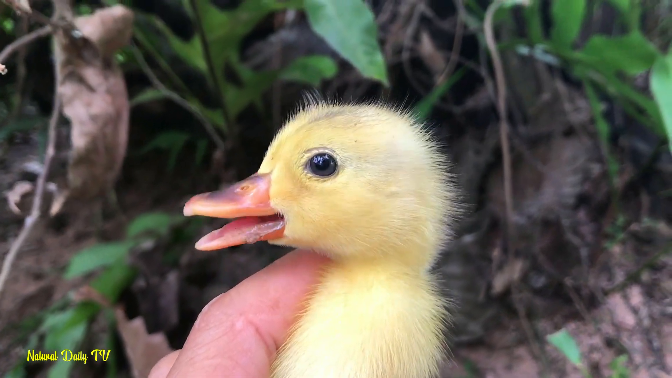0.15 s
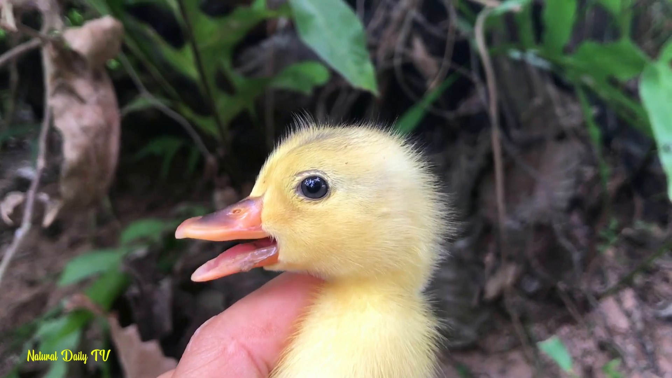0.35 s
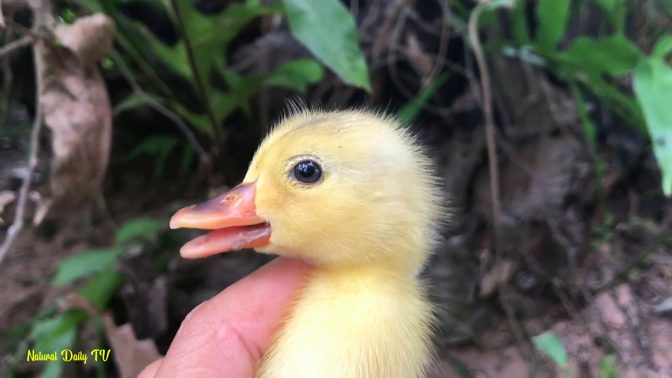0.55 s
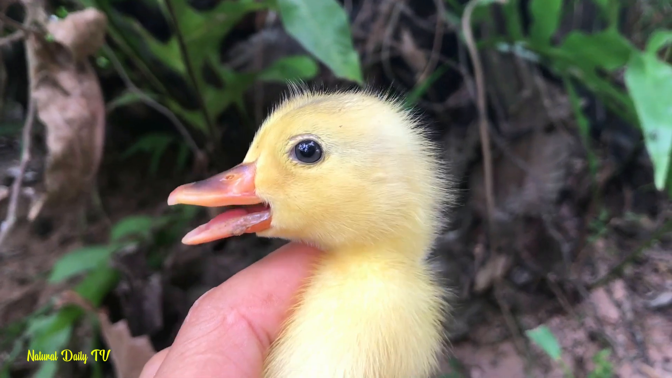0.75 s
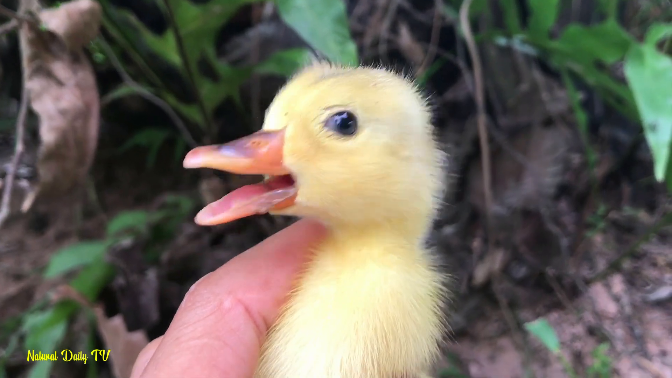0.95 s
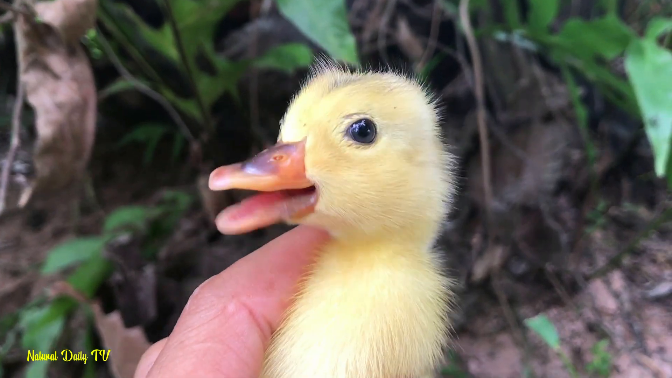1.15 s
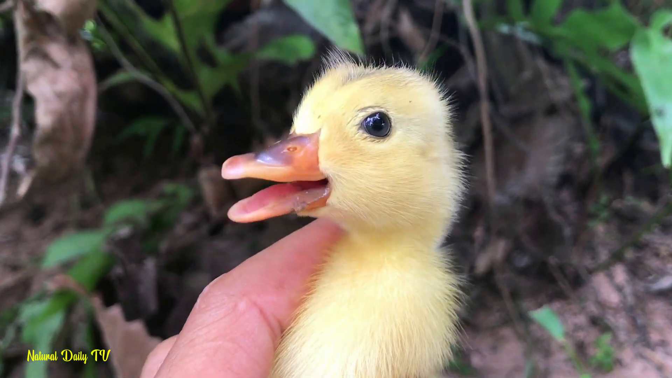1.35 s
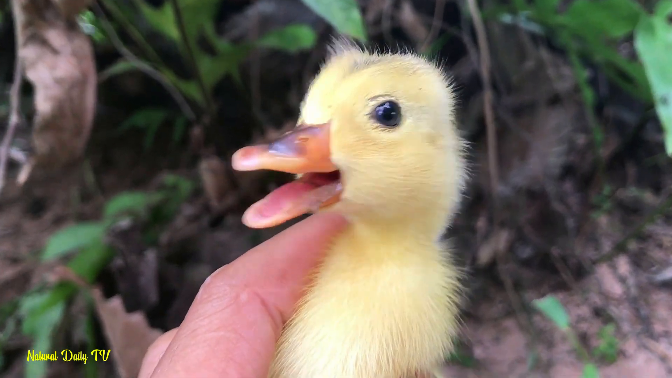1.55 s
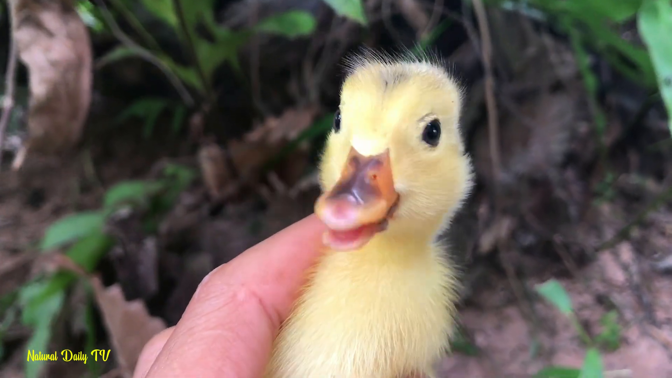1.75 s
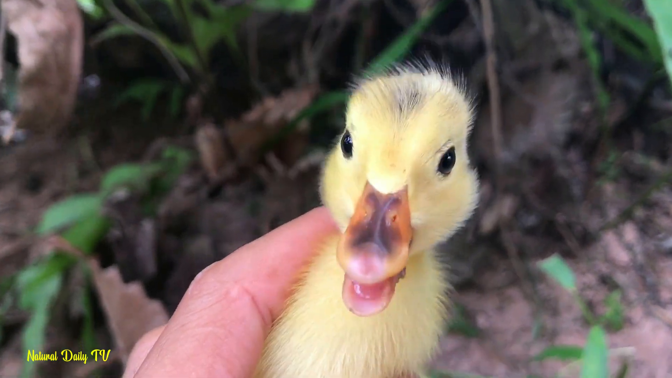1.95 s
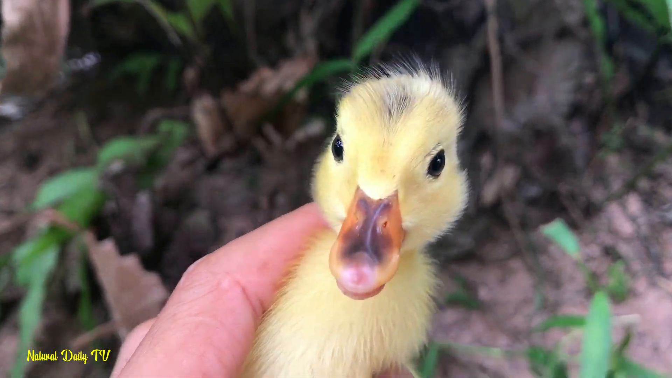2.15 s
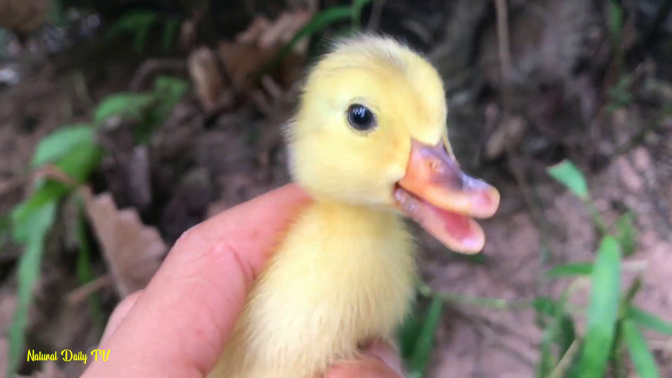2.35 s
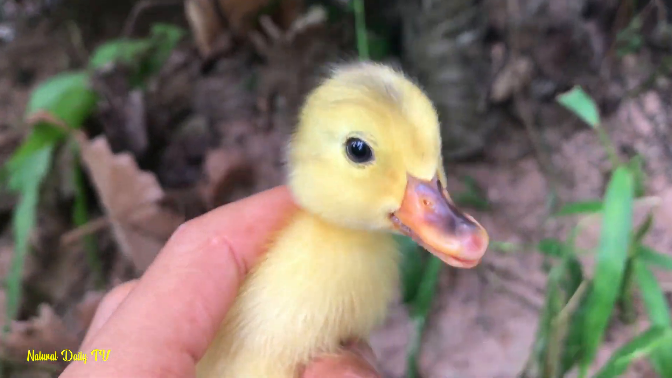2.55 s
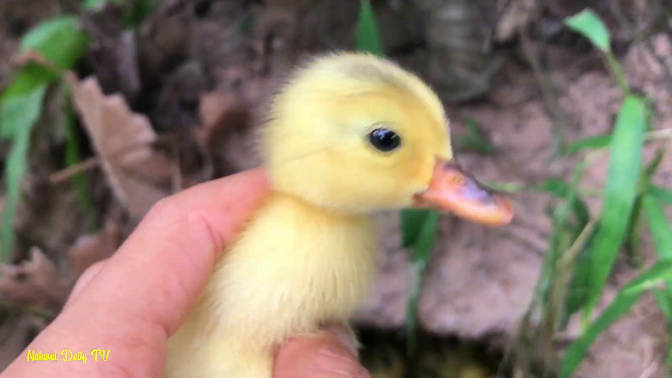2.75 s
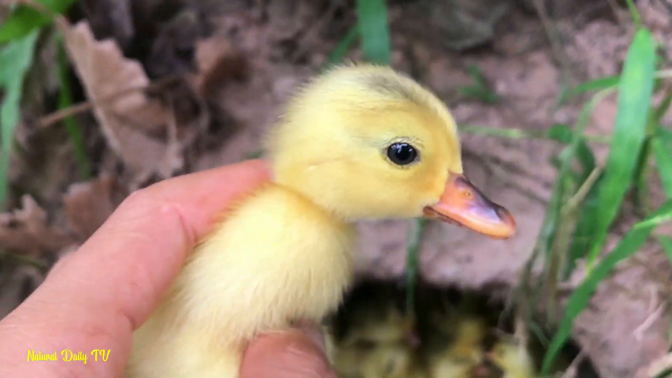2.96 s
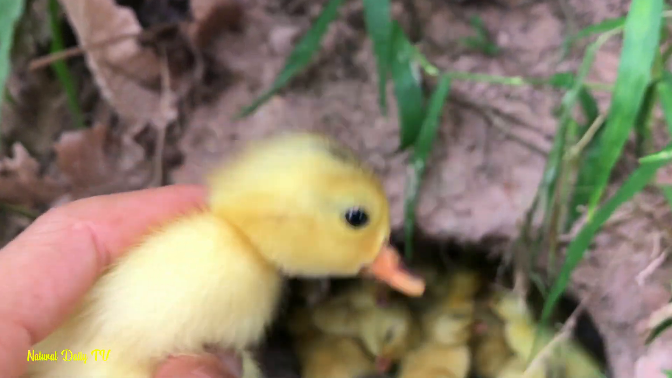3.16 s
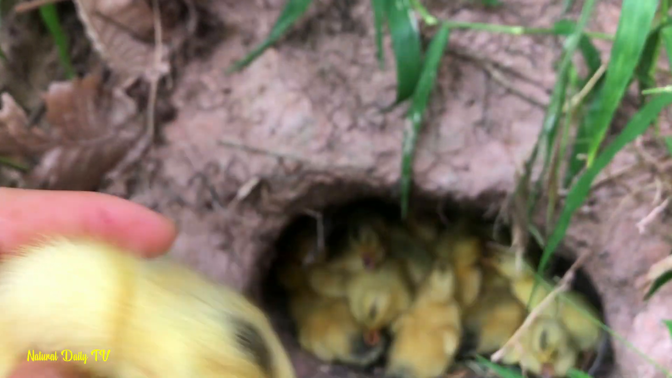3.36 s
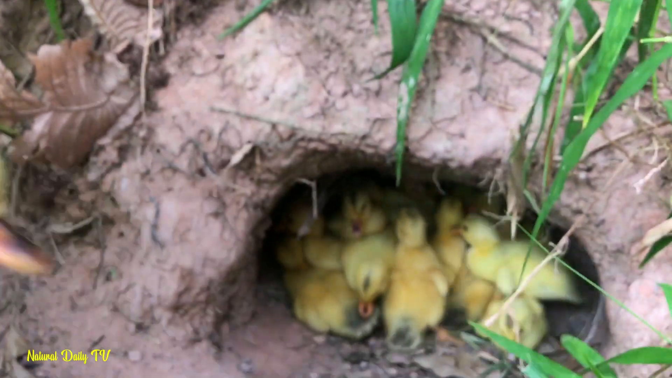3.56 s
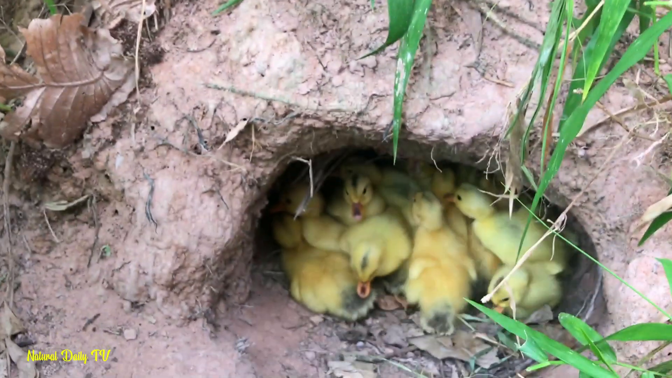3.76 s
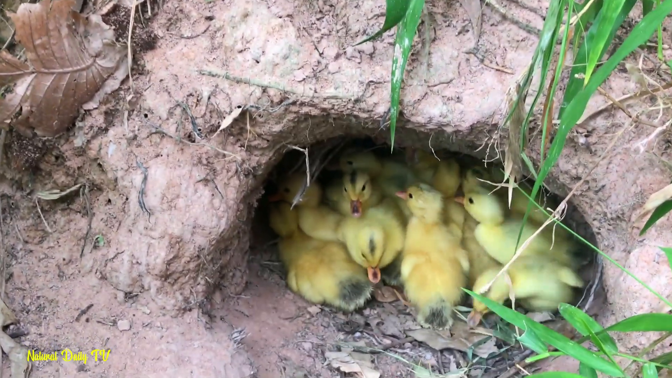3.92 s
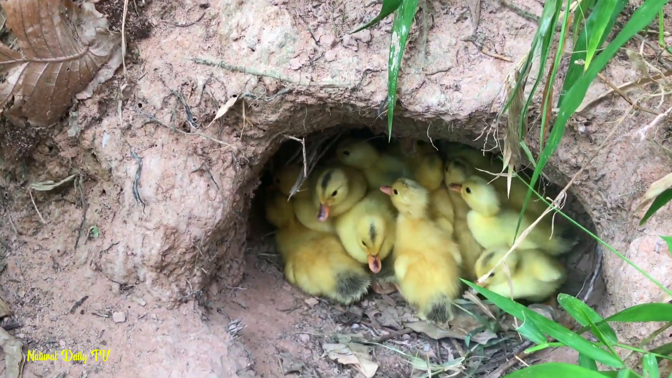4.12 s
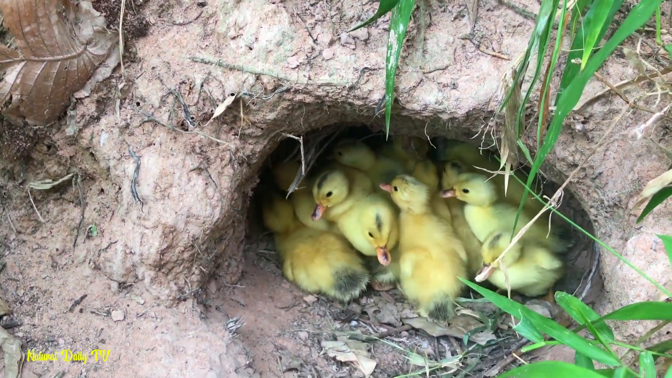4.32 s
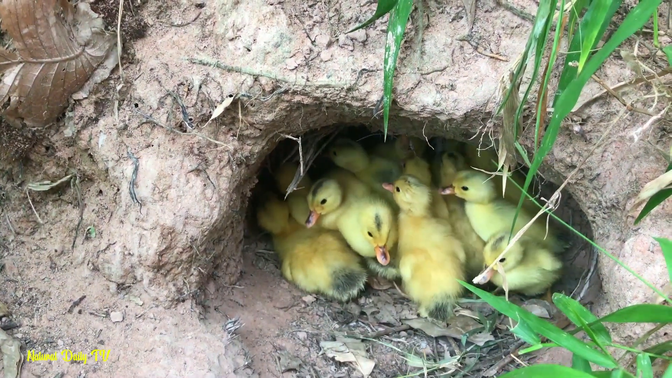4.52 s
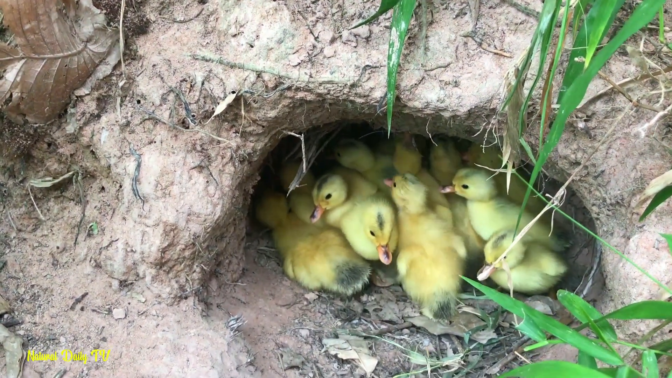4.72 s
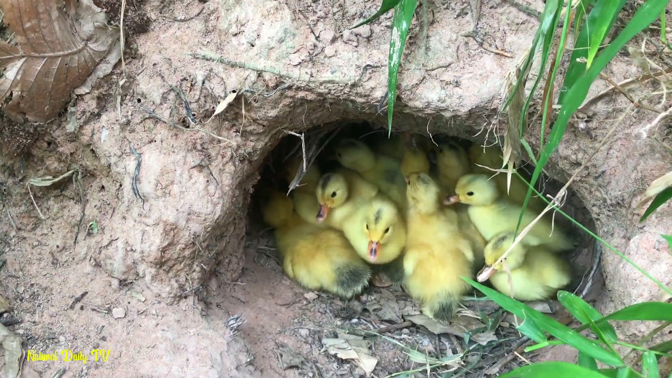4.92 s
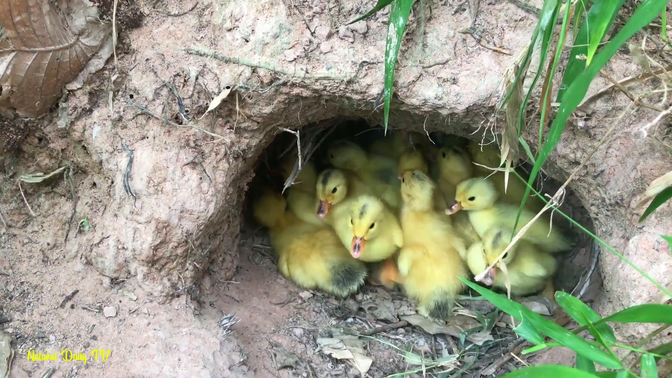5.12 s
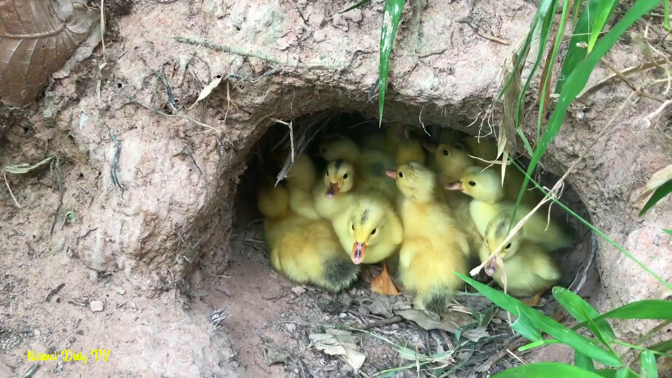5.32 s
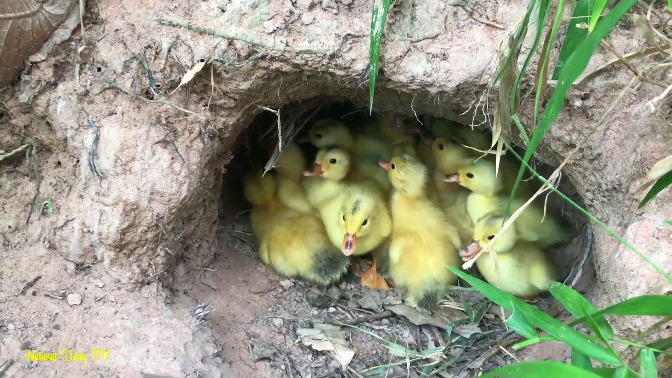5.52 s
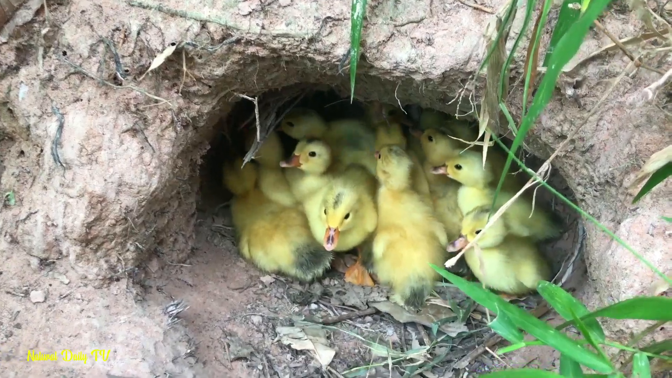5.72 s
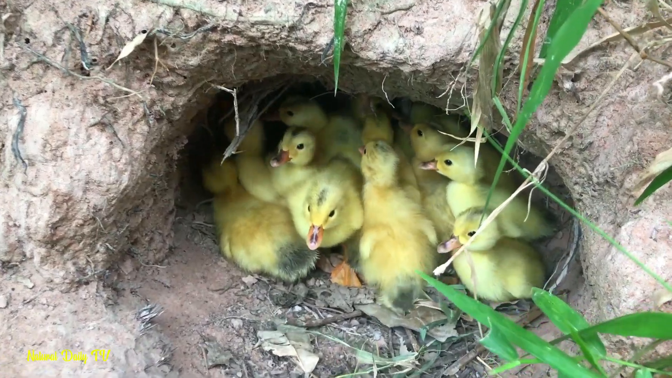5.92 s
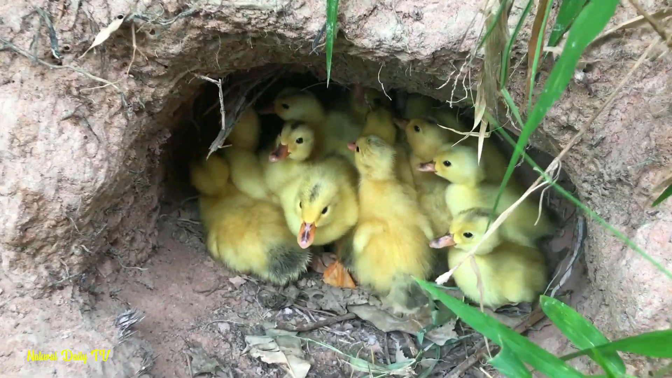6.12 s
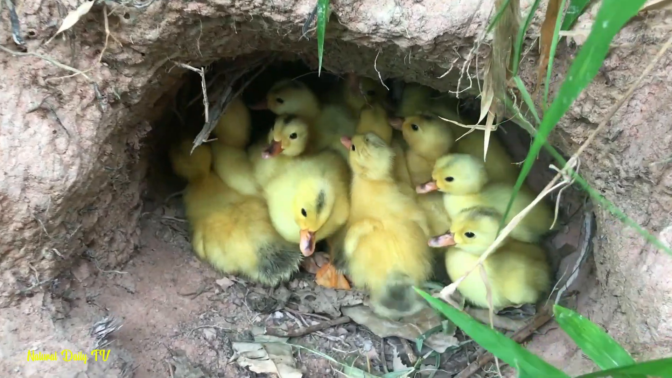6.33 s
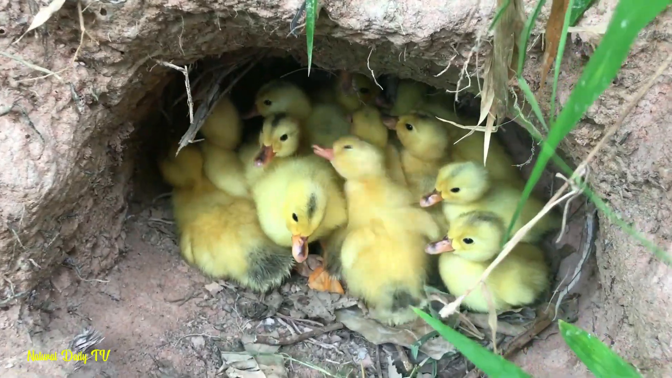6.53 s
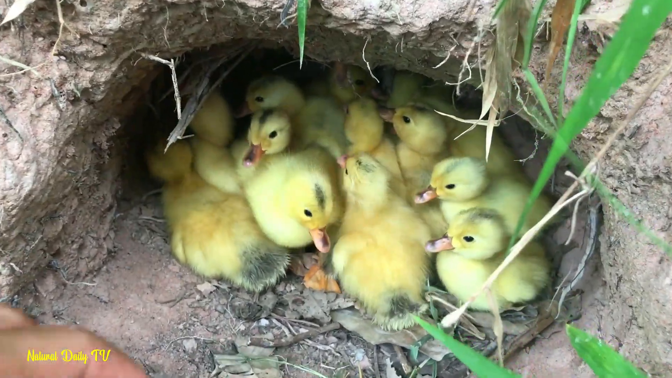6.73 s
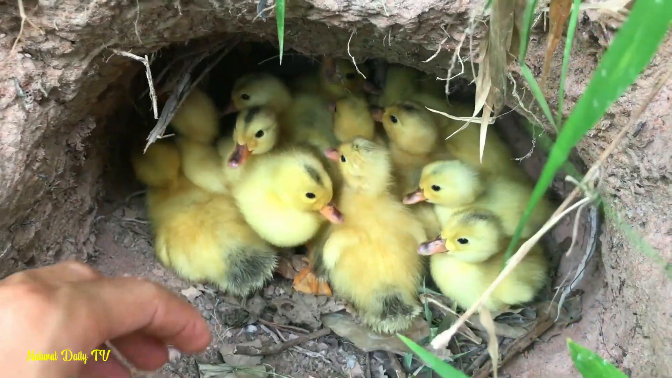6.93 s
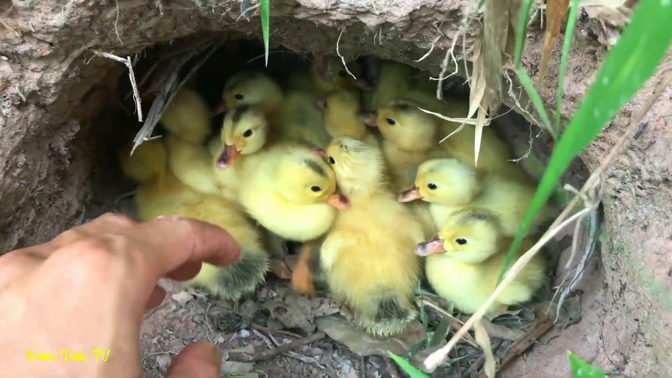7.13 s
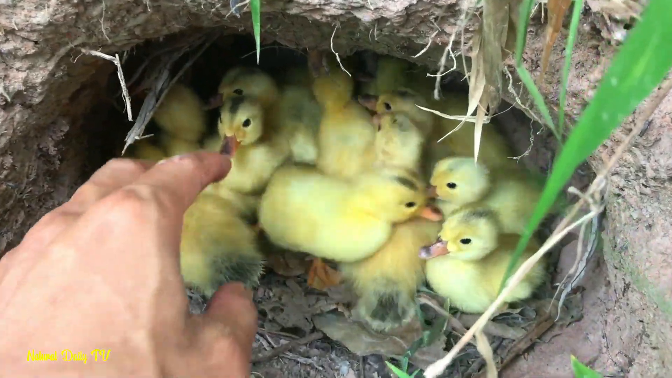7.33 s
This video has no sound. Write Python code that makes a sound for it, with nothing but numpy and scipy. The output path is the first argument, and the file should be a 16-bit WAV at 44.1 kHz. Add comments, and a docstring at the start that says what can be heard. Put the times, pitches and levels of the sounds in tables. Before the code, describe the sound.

From the start until about 2.5 seconds, a duckling very close to the microphone gives eight loud, shrill peeps, roughly three a second. Each is a short, slightly raspy whistle that leaps up, slides down and flicks at the end. Much softer arched peeps come from its nest mates in a soil hollow, scattered until about 6 seconds. Dry leaves snap and rustle from 2.6 to 4 seconds, again around 5.3 and 6, and at the very end. Dull, hollow bumps of fingers and steps come now and then, strongest near 4.9 seconds, with a low, heavy footfall and another thump around 7. Distant birds whistle faintly between 2 and 3 seconds, honk near 2.2 and 4.5, and twitter from 6 onward. A quiet low rumble and a hiss of open air run throughout.

```python
"""A duckling, held close, peeps eight loud syrinx whistles that leap, slide, flick and drop.
Its nest mates answer with soft arched peeps from a hollow in the soil; far birds whistle and honk.
Dry leaves rustle and snap in bursts of noise, fingers and steps thump a hollow body, and one heavy
footfall shakes the soil. A distant rumble hums under the hiss of the air."""
import sys
import numpy as np
from scipy import signal
from scipy.fft import rfft, irfft, next_fast_len
from scipy.io import wavfile
from scipy.ndimage import uniform_filter1d, map_coordinates

SR = 44100
rng = np.random.default_rng(int(sys.argv[2]) if len(sys.argv) > 2 else 0)


def transcribe(signal):
    """Save signal, clipped to [-1, 1], as a 16-bit WAV file at the path in sys.argv[1]."""
    frames = np.atleast_2d(signal).T
    limited = np.clip(frames, -1, 1)
    pcm = np.round(limited * 32767).astype(np.int16)
    wavfile.write(sys.argv[1], SR, pcm)


N = 325458
TOP_HZ = 15900


def amp(db):
    return 10 ** (np.asarray(db) / 20)


def unit(x):
    return x / np.sqrt(np.mean(x ** 2) + 1e-20)


def curves(rows):
    """One value per sample for each column after the time."""
    times, *columns = np.transpose(rows)
    return [np.interp(np.arange(N) / SR, times, column) for column in columns]


def wobble(rate, size=N):
    """A smooth random curve, rate knots a second."""
    return map_coordinates(rng.standard_normal(size=4096), [np.arange(size) * rate / SR])


def filtered(x, response):
    """x shaped by a gain that depends on frequency."""
    padded = next_fast_len(len(x) + 8192)
    return irfft(rfft(x, padded) * response(np.fft.rfftfreq(padded, 1 / SR)), padded)[:len(x)]


def noise(spectrum, size=N):
    """Noise of rms about 1, coloured by (frequency [Hz], level [dB]) points."""
    points_hz, db = np.transpose(spectrum)
    white = rng.standard_normal((size // 8192 + 1) * 8192)
    return unit(filtered(white, lambda hz: amp(np.interp(np.log(hz + 1), np.log(points_hz), db))))[:size]


def tone(hz):
    """A sine of rms 1 that follows a pitch curve."""
    return np.sqrt(2) * np.sin(2 * np.pi * (np.cumsum(hz) / SR + rng.random()))


def add(out, start, x):
    """Mixes x into out from start [s]."""
    part = out[round(start * SR):][:len(x)]
    part += x[:len(part)]


def fades(length, attack, release):
    """An envelope of length [s]; attack and release are shares of it."""
    u = np.linspace(0, 1, round(length * SR))
    return np.clip(np.minimum(u / attack, (1 - u) / release), 0, 1)


def chance_times(rate):
    """Scattered moments, rate a second, each with two normal draws."""
    slots = np.arange(0, N / SR - 1 / rate, 1 / rate)
    return zip(slots + rng.random(len(slots)) / rate, *rng.standard_normal((len(slots), 2)).T)


# Fader rides of the ambience: (time [s], leaf hiss level [dB], air level [dB])
BED_LEVELS = [(0.0, -69.5, -68), (0.31, -64, -70), (0.49, -70.5, -69.5), (0.9, -68.5, -66.5),
              (1.03, -76, -70.5), (2.82, -69, -69), (3.14, -63.5, -66.5), (4.01, -67.5, -70),
              (4.79, -69, -66), (5.36, -62.5, -66), (5.61, -70, -68.5), (6.27, -68.5, -68),
              (7.03, -73, -68.5), (7.38, -69, -67.5)]
# Colours of open air, far rumble and crisp leaves: (frequency [Hz], level [dB])
AIR_EQ = [(60, -27), (110, -8), (220, -9.5), (320, -7.5), (420, -13.5), (640, -12.5), (1100, -14.5),
          (1900, -20.5), (4300, -23.5), (6500, -45)]
RUMBLE_EQ = [(20, -33.5), (32, -15.5), (48, -9), (62, 4), (77, -8.5), (100, -4.5), (125, -11), (200, -20),
             (300, -49.5)]
LEAF_EQ = [(880, -30), (1500, -5), (2610, -6.5), (5440, -3.5), (7240, -7), (8830, -5), (10200, -8.5),
           (11300, -3.5), (15100, -10.5), (16000, -20.5)]


def outdoor_bed():
    """Patchy air, a distant rumble and the flickering hiss of dry leaves, grainy with tiny ticks."""
    leaf_db, air_db = curves(BED_LEVELS)
    air = amp(air_db + 4.5 + 1.6 * wobble(16) + .8 * wobble(6)) * noise(AIR_EQ)
    rumble = amp(-59) * noise(RUMBLE_EQ)
    ticks = (rng.random(N) < 80 / SR) * amp(4 + 3.3 * rng.exponential(size=N))
    grain = 1 + .3 * signal.lfilter([1], [1, -.95], ticks)
    hiss = amp(leaf_db + 2.5 * wobble(50) + 1.2 * wobble(14)) * unit(grain * noise(LEAF_EQ))
    return air + rumble + hiss


# Close peeps: (time [s], leap length [s], flick delay [s], crest pitch [Hz], dip pitch [Hz],
# flick pitch [Hz], crest level [dB], shoulder level [dB])
LOUD_PEEPS = [(0.0593, 0.0065, 0.11, 4170, 3556, 4190, -21, -28),
              (0.3583, 0.0064, 0.1, 4200, 3535, 4270, -19, -27.5),
              (0.656, 0.005, .1045, 4173, 3620, 4100, -19, -26.5),
              (0.9459, 0.0064, 0.11, 4234, 3560, 4654, -19.5, -24),
              (1.249, .0076, 0.11, 4210, 3532, 4366, -17.5, -25.5),
              (1.5596, .0064, 0.1, 4115, 3440, 3774, -17.5, -27),
              (1.8887, 0.0079, 0.1, 4140, 3330, 3812, -17.5, -27.5),
              (2.3576, 0.019, 0.088, 4197, 3603, 4500, -16, -26.5)]
# Timbre at start, crest, slide, dip, shoulder, flick and end, relative to the whistle:
# (2nd harmonic [dB], 3rd harmonic [dB], 4th harmonic [dB], side voice [dB], rasp [dB])
PEEP_TIMBRE = [(-30.5, -41, -49.5, -18, -14.5), (-22.5, -30, -43, -22.5, -29.5),
               (-20.5, -28.5, -35, -29.5, -32), (-21, -29.5, -36, -30.5, -32.5),
               (-16, -28.5, -36, -32, -33), (-18.5, -29, -49, -16.5, -21), (-20, -47, -51, -36, -26)]
# The throat's shaping of the overtones, and the colour of the rasp: (frequency [Hz], level [dB])
THROAT_EQ = [(6000, 1), (8200, 0), (8800, -15.5), (10000, -5), (11500, 0.5), (13000, -5.5), (14500, -0.5)]
RASP_EQ = [(1500, -58.5), (2500, -21), (4400, -2.5), (5450, 4.5), (6200, -6), (8400, -7.5), (9300, -23.5),
           (11500, -8), (16000, -7)]
PEEP_S, SLIDE_S, SHOULDER_S, TAIL_S = .1135, .043, .009, .0023
DROP_S_PER_HZ, SPENT_DB_PER_S = 4e-6, 904  # a higher flick falls longer; a slower drop is fainter


def held_duckling():
    """A syrinx whistle: leap up, slide down, climb, flick, drop; with overtones, a side voice and rasp."""
    out = np.zeros(N)
    for start, leap, flick_delay, crest_hz, dip_hz, flick_hz, crest_db, shoulder_db in LOUD_PEEPS:
        crest, flick = start + leap, start + flick_delay
        slide, dip, shoulder = crest + SLIDE_S / 2, crest + SLIDE_S, flick - SHOULDER_S
        end = start + PEEP_S + (flick_hz - crest_hz) * DROP_S_PER_HZ
        end -= .44 * (PEEP_S - SHOULDER_S - flick_delay)  # an early flick cuts the peep short
        t = np.arange(start, end + TAIL_S, 1 / SR)

        shoulder_hz = dip_hz + .47 * (flick_hz - dip_hz)
        bends = [(start, 3050), (start + .34 * leap, (.99 - 4.5 * leap) * crest_hz), (crest, crest_hz),
                 (slide, .38 * crest_hz + .622 * dip_hz), (dip, dip_hz),
                 ((dip + flick) / 2, .52 * dip_hz + .48 * shoulder_hz), (shoulder, shoulder_hz),
                 (flick, 1.01 * flick_hz), (.6506 * flick + .3507 * end, .95 * flick_hz),
                 (end + TAIL_S, .77 * dip_hz - 420)]
        hz = uniform_filter1d(np.interp(t, *np.transpose(bends)), size=80)
        hz *= 1 + .0036 * wobble(350, len(t))

        # the level swells past the crest, eases off, and breaks just before the flick
        dip_db = -24.9 + .35 * (crest_db + 18)
        flick_db = shoulder_db - 4.5 - SPENT_DB_PER_S * max(end - flick - .012, 0)
        envelope = [(start, -46), (start + .35 * leap, crest_db - 10), (crest, crest_db - 6),
                    (crest + .005, crest_db - 1), (crest + .013, crest_db), (slide, crest_db - 4),
                    (dip, dip_db), (flick - .006, shoulder_db), (flick - .002, flick_db),
                    (.4 * flick + .6 * end, flick_db), (end, -43), (end + TAIL_S, -66)]
        db = np.interp(t, *np.transpose(envelope)) + .6 * wobble(200, len(t))

        stages = [start, crest, slide, dip, shoulder, flick, end]
        *overtones_db, side_db, rasp_db = (np.interp(t, stages, c) for c in np.transpose(PEEP_TIMBRE))
        phase = 2 * np.pi * np.cumsum(hz) / SR
        whistle = np.sin(phase)
        effort_db = .7 * (crest_db + 19.5)  # harder peeps are brighter
        for k, overtone_db in enumerate(overtones_db, start=2):
            in_band = k * hz < TOP_HZ + 1000
            throat_db = np.interp(k * hz, *np.transpose(THROAT_EQ))
            flutter_db = 2.2 * wobble(50, len(t)) + 1.6 * wobble(500, len(t))
            whistle += in_band * amp(overtone_db + effort_db + throat_db + flutter_db) * np.sin(k * phase)

        # a second membrane beats with the first: a broken tone above it, further off at high pitch
        side_hz = hz + 800 + 1.2 * np.clip(hz - 3650, 0, None) + 55 * wobble(410, len(t))
        side = amp(side_db + .7 + 4.2 * wobble(170, len(t))) * tone(side_hz)
        rasp_db += 2 + .6 * (crest_db + 19) + 2 * wobble(120, len(t))
        rasp = amp(rasp_db) * noise(RASP_EQ, len(t))
        add(out, start, amp(db) * (np.sqrt(2) * whistle + side + rasp))
        tick = amp(-60 * (t - start) / .008) * noise(LEAF_EQ, len(t))
        add(out, start - .002, amp(crest_db - 12.5 - 1500 * leap) * tick)  # faster leap, harder attack
    return out


# Answers from the nest: (time [s], rise [s], fall [s], crest pitch [Hz], end pitch [Hz], level [dB])
SOFT_PEEPS = [(0.098, 0.0028, 0.026, 3250, 1980, -51.5), (1.055, 0.012, 0.033, 2360, 1810, -63),
              (1.378, 0.015, 0.054, 3090, 1850, -55.5), (1.638, 0.0062, 0.042, 3030, 2004, -51),
              (1.91, 0.01, 0.049, 2810, 1870, -52), (2.254, 0.018, 0.04, 2820, 2000, -46.5),
              (2.609, 0.014, 0.035, 2850, 2070, -45), (2.86, 0.017, 0.041, 3084, 2220, -47.5),
              (3.718, .036, .062, 3510, 2200, -58), (3.959, .028, .048, 3830, 2520, -60),
              (4.03, .004, .045, 2650, 2500, -61), (4.23, .031, .024, 3860, 2820, -54.5),
              (4.249, .016, .04, 3430, 2180, -51), (4.392, .024, 0.061, 3530, 1960, -56.5),
              (5.465, 0.023, 0.023, 2890, 2220, -51), (5.545, 0.0058, .025, 3250, 2560, -61.5),
              (5.575, 0.02, 0.033, 3314, 2240, -54), (5.74, 0.021, 0.03, 3350, 2430, -54.5),
              (5.93, 0.018, 0.026, 3050, 2280, -56.5)]
MEAN_RISE_HZ_PER_S = 40000


def nest_mates():
    """Soft arched whistles: a quick rise and a mostly longer fall."""
    out = np.zeros(N)
    for start, rise, fall, crest_hz, end_hz, db in SOFT_PEEPS:
        t = np.arange(0, rise + fall, 1 / SR)
        rising = MEAN_RISE_HZ_PER_S * rise * (1 - t / rise) ** 2
        falling = (crest_hz - end_hz) * (np.sin((t - rise) / fall) / np.sin(1)) ** 2
        hz = crest_hz - np.where(t < rise, rising, falling) + 40 * wobble(300, len(t))
        swell = np.abs(np.sin(np.pi * (t / (rise + fall)) ** 1.12)) ** .55
        add(out, start, amp(db - 2.2 + 2.7 * wobble(130, len(t))) * swell * tone(hz))
    return out


# Strokes through dry leaves: (time [s], length [s], scrape level [dB], fizz level [dB])
LEAF_STROKES = [(0.244, .02, -63, -51), (0.296, 0.021, -62, -56), (0.321, .016, -67.5, -51),
                (0.573, .019, -66, -52), (1.832, .03, -70.5, -66), (2.96, .02, -67, -56),
                (2.984, 0.049, -55, -56.5), (3.03, .14, -60, -77), (3.5, .065, -66.5, -58),
                (3.618, .05, -68, -59.5), (3.743, .06, -62, -57), (4.028, 0.035, -62, -60.5),
                (4.119, .03, -71, -64.5), (4.351, .063, -61, -57), (4.552, .02, -58, -62),
                (4.873, .038, -54, -57), (4.951, 0.012, -55.5, -60.5), (5.098, 0.035, -60.5, -59.5),
                (5.15, 0.024, -58, -61.5), (5.243, .055, -69, -61), (5.355, 0.105, -78, -65.5),
                (5.751, .03, -61.5, -66), (6.06, 0.022, -58.5, -66), (6.5, 0.11, -69, -66),
                (7.19, .035, -75, -62)]
# Midrange colour of the scrape: (frequency [Hz], level [dB])
SCRAPE_EQ = [(350, -34), (750, -2.5), (1500, -1.5), (2600, -5), (5000, -28.5)]


def leaf_brushes():
    """Brushed leaves give a gritty scrape and a bright fizz: set strokes, faint strays, one per snap."""
    leaf_db = curves(BED_LEVELS)[0]
    strays = [(start, .015, *(leaf_db[round(start * SR)] + 2 + 3 * np.array([a - 1.5, b])))
              for start, a, b in chance_times(rate=3.5)]
    with_snaps = [(start - .004, .0164, db - 34.5, db - 26) for start, db, _ in LEAF_SNAPS]
    scrape, fizz = np.zeros(N), np.zeros(N)
    for start, length, scrape_db, fizz_db in LEAF_STROKES + strays + with_snaps:
        stroke = fades(length + .0052, attack=.15, release=.4)
        add(scrape, start, amp(scrape_db) * stroke)
        add(fizz, start, amp(fizz_db) * stroke)
    grit = unit(amp(3.6 * wobble(300)))
    return amp(1.1) * grit * (scrape * noise(SCRAPE_EQ) + fizz * noise(LEAF_EQ))


# Finger bumps and steps: (time [s], level [dB], knock gain above 400 Hz [dB])
BLOWS = [(2.205, -50, -5), (2.455, -48, -10.5), (2.75, -50, -0.5), (4.002, -44.5, -5), (4.57, -49, -6.5),
         (4.734, -51.5, 0.5), (4.87, -43.5, 3.5), (4.88, -27.5, -6.5), (4.896, -38, -9), (4.93, -50, 2),
         (4.96, -41.5, -6), (5.1, -38, -6.5), (5.227, -50, -8.5), (5.824, -57, 7), (6.015, -49.5, -2.5),
         (6.063, -58, 6), (6.26, -48.5, -6), (6.969, -39.5, -8), (7.128, -33.5, -6), (7.25, -46.5, -4)]
# Resonances of the hollow body: (frequency [Hz], level [dB], time to fall 60 dB [s])
BODY_MODES = [(160, 4, .11), (240, 1, .06), (305, -2, .065), (553, -1, 0.043), (698, 1.5, 0.035),
              (950, -2, 0.033), (1330, -6.5, 0.037), (1730, -10.5, .025)]
BOOM_DB = -12.5  # trim on the lowest mode


def thumps():
    """Dull blows, with faint strays throughout, ring one hollow body a little differently each time."""
    out, t = np.zeros(N), np.arange(SR // 5) / SR
    strays = [(start, -58 + 2 * a, 3 * b) for start, a, b in chance_times(rate=1.5)]
    attack = 1 - np.exp(-t / .0016)
    for start, db, knock_db in BLOWS + strays:
        ring = np.zeros(len(t))
        for hz, mode_db, t60 in BODY_MODES:
            struck_db = mode_db + (hz < 200) * BOOM_DB + (hz > 400) * knock_db + rng.normal(0, 2.5)
            detuned_hz = hz * (1 + rng.normal(0, .05))
            ring += amp(struck_db - 60 * t / t60) * np.sin(2 * np.pi * detuned_hz * t)
        add(out, start, amp(db + 1.46) * attack * ring)
    return out


# Distant whistles and honks: (time [s], length [s], pitch [Hz], level [dB])
FAR_WHISTLES = [(2.11, .15, 2790, -65.5), (2.47, .15, 2884, -61), (2.66, .12, 2180, -67.5),
                (2.79, 0.17, 2960, -57), (2.8, 0.11, 2135, -64), (4.77, 0.065, 2195, -62),
                (6.35, .05, 3660, -72), (6.5, .05, 3680, -70), (6.573, 0.07, 4310, -66),
                (6.71, 0.076, 4430, -71), (7.01, .04, 2315, -66), (7.27, 0.068, 3540, -68)]
FAR_HONKS = [(2.199, 0.092, 331.5, -64), (4.547, 0.25, 332, -64.5)]
# Nasal timbre of a honk: (harmonic [number], level [dB])
HONK_TIMBRE = [(2, -11.5), (3, -11), (4, 1.5), (5, -8.5), (7, -12.5)]
TWITTER_FROM_S, TWITTER_STEP_S, TWITTER_NOTE_S = 6.02, .14, .06


def far_birds():
    """Wavering whistles on held pitches, nasal honks and a faint twitter hopping between two notes."""
    out = np.zeros(N)
    twitter = []
    for k, start in enumerate(np.arange(TWITTER_FROM_S, N / SR, TWITTER_STEP_S)):
        hz = rng.normal(3630 if k % 2 else 4400, 90)
        twitter.append((rng.normal(start, .03), TWITTER_NOTE_S, hz, rng.normal(-73, 2)))
    honks = [(start, length, k * hz, db + harmonic_db)
             for start, length, hz, db in FAR_HONKS for k, harmonic_db in HONK_TIMBRE]
    for start, length, hz, db in FAR_WHISTLES + twitter + honks:
        swell = fades(length, attack=.13, release=.26)
        level = amp(db - 3.5 + 4.5 * wobble(70, len(swell)))
        add(out, start, level * swell * tone(hz + 60 * wobble(110, len(swell))))
    return out


# Dry leaves breaking: (time [s], level [dB], brightest frequency [Hz])
LEAF_SNAPS = [(2.6276, -40, 2800), (2.7506, -36.5, 2580), (3.0003, -32, 2863), (3.1796, -32, 8200),
              (3.2254, -33.5, 1470), (3.2724, -31.5, 10910), (3.3403, -32, 6070), (3.4184, -31, 2440),
              (3.5336, -29, 5900), (3.7414, -37, 3450), (3.8349, -42, 2750), (4.0018, -35.5, 3260),
              (5.261, -39.5, 9100), (5.2782, -31.5, 5250), (5.3173, -32, 5340), (5.8201, -36, 5860),
              (5.9691, -37.5, 12000), (6.4582, -41.5, 1330), (7.3072, -30.5, 10300), (7.3694, -36, 1800)]
SNAP_T60_S = .005


def leaf_snaps():
    """Each leaf cracks in a tight burst of noise with a colour of its own."""
    out, t = np.zeros(N), np.arange(900) / SR
    for start, db, hz in LEAF_SNAPS:
        colour = [(hz / 8, -30), (hz / 1.8, -12), (hz, 0), (hz * 1.4, -10), (hz * 8, -16)]
        add(out, start, amp(db - 3.5 - 60 * t / SNAP_T60_S) * noise(colour, len(t)))
    return out


def footfall(start=6.972, db=-43.5, hz=95.6, t60=.27):
    """One heavy step shakes the soil: a low, wavering boom."""
    out, t = np.zeros(N), np.arange(SR // 5) / SR
    envelope = amp(db - 60 * t / t60) * (1 - np.exp(-t / .0054))
    add(out, start, envelope * tone(hz + 25 * wobble(28, len(t))))
    return out


def echoes(x, t60):
    """A short diffuse reverb from soil and leaves."""
    t = np.arange(SR // 3) / SR
    tail = amp(-60 * t / t60) * rng.standard_normal(len(t))
    return signal.fftconvolve(x, tail / np.linalg.norm(tail))[:N]


def scene():
    """The duckling up front and almost dry, the nest wetter, the far birds blurred by the leaves."""
    near, nest, far = held_duckling(), nest_mates(), far_birds()
    wet = amp(-29.5) * echoes(near, t60=.16)
    wet += amp(-11) * echoes(nest, t60=.095)
    wet += amp(-5) * echoes(far, t60=.25)
    foley = leaf_brushes() + thumps() + leaf_snaps() + footfall()
    return (near + nest + far + wet + foley + outdoor_bed())[None]


def record(dry):
    """A brick-wall high cut on the whole mix."""
    return filtered(dry[0], lambda hz: hz < TOP_HZ)[None]


dry = scene()
out = record(dry)
transcribe(out)
```